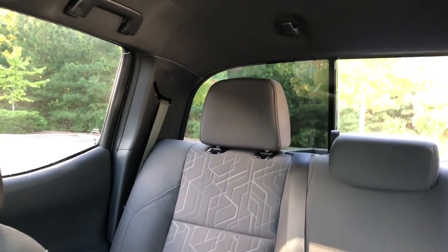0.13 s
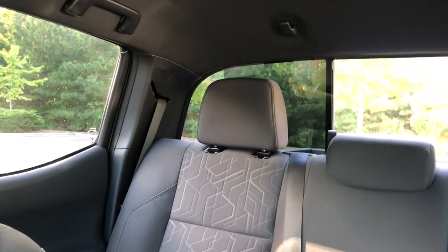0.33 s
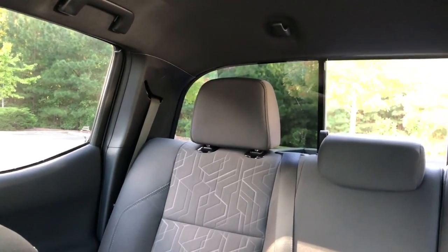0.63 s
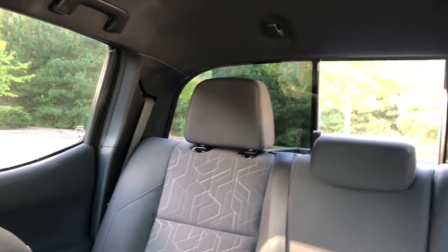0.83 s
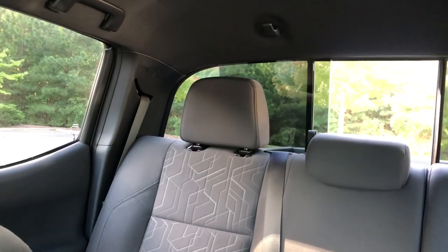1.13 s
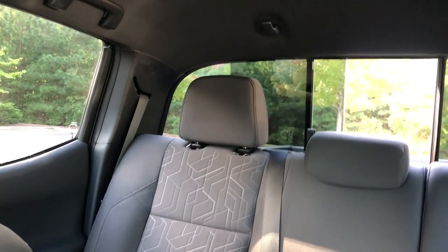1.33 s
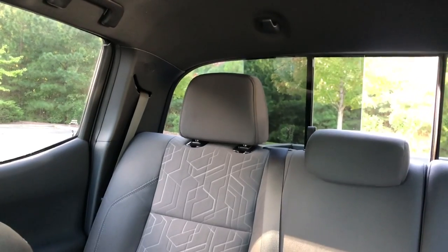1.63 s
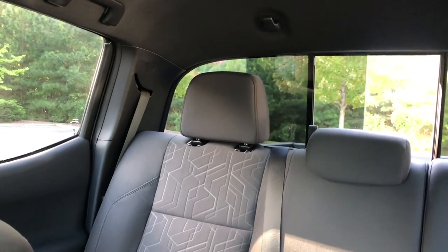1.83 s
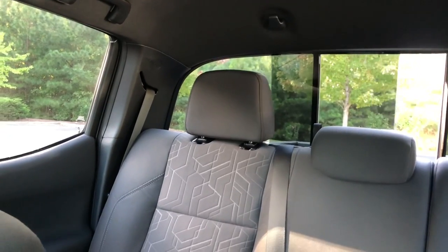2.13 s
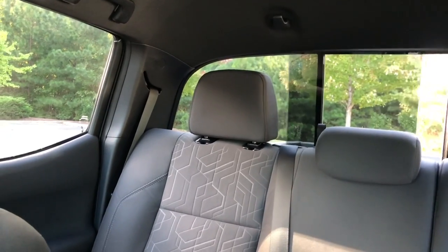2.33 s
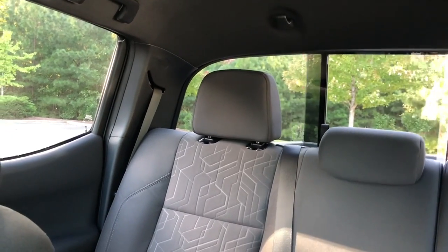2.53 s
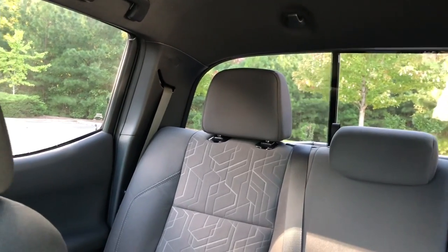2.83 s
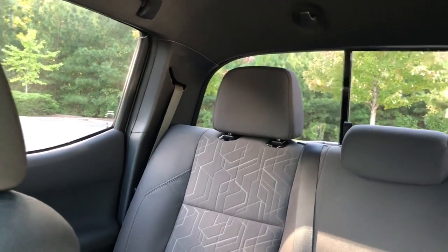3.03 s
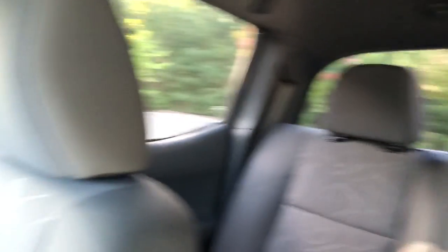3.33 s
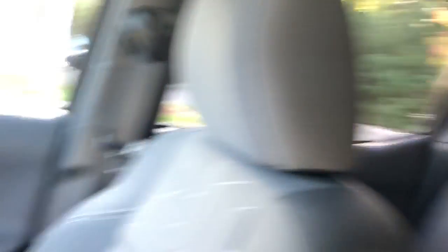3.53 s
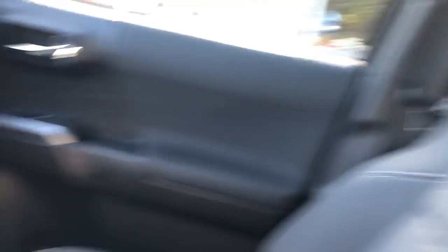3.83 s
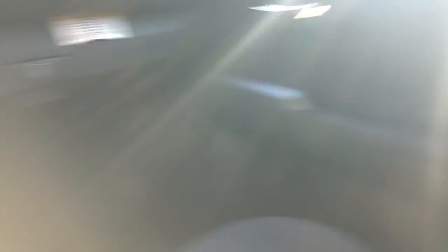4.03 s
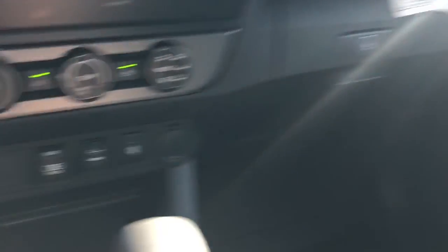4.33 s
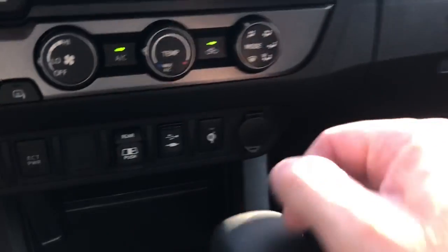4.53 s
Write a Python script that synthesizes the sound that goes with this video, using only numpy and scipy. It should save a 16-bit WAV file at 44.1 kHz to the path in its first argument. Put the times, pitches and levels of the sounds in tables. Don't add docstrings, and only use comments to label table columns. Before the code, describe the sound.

Handheld phone microphone inside an idling pickup. A sliding rear window already moving clunks to a halt; after a pause, ticks and knocks precede a second humming run, a short gap, then a longer third run that strains and cracks against its stop. Finally, soft cloth swishes and a flurry of low handling bumps.

```python
import sys
import numpy as np
from scipy import signal
from scipy.fft import rfft, irfft
from scipy.io import wavfile
from scipy.ndimage import uniform_filter1d

SR = 44100
rng = np.random.default_rng(int(sys.argv[2]) if len(sys.argv) > 2 else 0)


def master_out(mix):
    frames = np.transpose(np.atleast_2d(mix))
    ceiling = np.clip(frames, -1, 1)
    pcm = np.round(ceiling * 32767).astype(np.int16)
    wavfile.write(sys.argv[1], SR, pcm)


def invert_db(level):
    return 10 ** (np.asarray(level, dtype=float) / 20)


N = 207132
T = np.arange(N) / SR


def colour(x, db_of_hz):
    f = np.fft.rfftfreq(len(x), 1 / SR) + 1
    y = irfft(rfft(x) * invert_db(db_of_hz(f)), len(x))
    return y / y.std()


def lifts(f, modes):
    return sum(db / (1 + (2 * (f - hz) / width) ** 2) for hz, width, db in modes)


def noise(shape, db):
    hz, gain = np.transpose(shape)
    return invert_db(db) * colour(rng.standard_normal(N), lambda f: np.interp(np.log(f), np.log(hz), gain))


def band(x, lo_hz, hi_hz):
    return signal.sosfilt(signal.butter(2, [lo_hz, min(hi_hz, .45 * SR)], "band", fs=SR, output="sos"), x)


def walk(rate):
    k = int(SR / rate)
    steps = np.repeat(rng.standard_normal(N // k + 1), k)
    return 1.293 * uniform_filter1d(uniform_filter1d(steps, k), k)[:N]


def curves(rows, fade=0.014):
    s, *columns = np.transpose(rows)
    gate = np.clip(np.minimum(T - s[0] + fade, s[-1] + fade - T) / fade, 0, 1)
    return [gate] + [np.interp(T, s, c) for c in columns]


def tone(hz, db):
    return np.sqrt(2) * invert_db(db) * np.sin(2 * np.pi * (np.cumsum(hz) / SR + rng.random()))


def add(out, s, x, db):
    i = int(s * SR)
    out[i:i + len(x)] += (x * invert_db(db) / np.abs(x).max())[:N - i]


def clicks(events, slope_db, rise_s, rise_share, top_hz):
    out, t = np.zeros(N), T[:SR // 8]
    for s, db, hz, t60 in events:
        def tint(f):
            slope = slope_db * np.log2(f / hz)
            low_cut = -24 * np.log2(1 + 700 / f) ** 2
            high_cut = -6 * np.log2(1 + (f / top_hz) ** 4)
            return slope + low_cut + high_cut + lifts(f, [(hz, 0.35 * hz, 8)])

        burst = colour(rng.standard_normal(len(t)), tint)
        rise = max(rise_s + rise_share * t60, .0005)
        decay = invert_db(-60 * np.maximum(t - rise, 0) / np.clip(t60, .01, .25))
        add(out, s - .5 * rise, burst * np.minimum(t / rise, 1) ** 2 * decay, db)
    return out


def blows(events, body, scatter_db, rise_s):
    out, t = np.zeros(N), T[:SR // 3]
    f, mode_db = np.transpose(body)
    for s, db, hz, tilt_db, t60 in events:
        chance = rng.standard_normal((3, len(f)))
        gain = invert_db(mode_db + tilt_db * np.log2(f / 200) + scatter_db * chance[0]) * np.sign(chance[2])
        t60 = np.clip(t60, .02, .17)
        ring = t60 * (200 / f) ** .5
        mode_hz = f * (1 + 0.043 * chance[1])
        x = (gain * invert_db(-60 * t[:, None] / ring) * np.sin(2 * np.pi * mode_hz * t[:, None])).sum(axis=1)
        x = x + 1.75 * invert_db(-60 * t / t60) * np.sin(2 * np.pi * hz * t)
        add(out, s - .001, x * (1 - np.exp(-(t / rise_s) ** 2)), db)
    return out


def idle():
    # hz, level_db (per Hz)
    cabin = [(15, -57.5), (25, -15.5), (53, -8.5), (75, -8.5), (113, 1), (156, -4.5), (194, -5),
             (267, -14.5), (298, -10.5), (332, -16.5), (369, -16.5), (446, -19.5), (1620, -34), (1810, -40),
             (15600, -62)]
    # multiple of the firing rate, level_db (re firing line)
    orders = [(2, -2.5), (2.5, -2.5), (3, -5), (4, -7.5), (5, -14)]
    # start_s, level_db
    rumble = [
        (0, -45),
        (1.2, -45.5),
        (1.78, -46.5),
        (2.3, -43),
        (2.95, -46.5),
        (4.2, -43.5),
        (4.7, -39),
    ]
    firing_hz, line_db, order_db = 49.96, -50, -50.5
    turn_s, turn_takes_s, shadow_db = 3.57, .2, -24
    line_db = line_db + shadow_db * np.clip((T - turn_s) / turn_takes_s, 0, 1)
    hz = firing_hz * (1 + 0.00384 * walk(2.89))
    line = tone(hz, line_db + .7 * walk(6))
    upper = sum(tone(k * hz, db + order_db + 1.7 * walk(15)) for k, db in orders)
    throb = 1 + 0.05 * np.sin(np.pi * np.cumsum(hz) / SR)
    rumble_db = curves(rumble)[1]
    return line + upper + throb * noise(cabin, rumble_db + .9 * walk(12))


def felt_on_glass():
    # hz, level_db (per Hz)
    slide = [(710, -48), (1200, -35), (1800, 1.5), (1940, -9), (2190, -1), (2800, -1), (3090, -1),
             (3620, 1), (3950, 3.5), (4350, -2), (6610, -9), (7050, -10), (9830, -11.5), (10700, -16.5),
             (15600, -20.5)]
    # hz, width_hz, lift_db
    pane = [(2130, 47, 2), (2660, 55, -14), (2960, 110, -1), (3420, 64, 6), (3705, 450, -8.5),
            (4020, 60, -6), (4500, 250, 2.5), (4800, 140, 2.5), (5650, 76, 4.5), (6620, 90, 7.5),
            (6830, 180, -3), (7160, 110, -10), (8400, 170, -2), (10100, 180, 3.5), (10400, 200, -2),
            (11300, 300, 4)]
    streak_db, patchy_db = -25, 4.5
    felt = colour(noise(slide, 0), lambda f: lifts(f, pane))
    other = colour(noise(slide, 0), lambda f: lifts(1.045 * f, pane))
    turn = np.pi / 4 * (1 + 1.1 * walk(6))
    felt = invert_db(1.3 * walk(40)) * (np.cos(turn) * felt + np.sin(turn) * other)
    for hz, _, _ in pane:
        streak = band(rng.standard_normal(N), hz - 30, hz + 30)
        level_db = streak_db - 10 * max(np.log2(hz / 4500), 0) + patchy_db * walk(7)
        felt = felt + invert_db(level_db) * streak / streak.std()
    return felt


def drive(start, stop, hz, db, grind_db, strain_db):
    sag_hz_per_s, spin_up_s, spin_up_db, fade_db_per_s2 = 28, 0.17, -10, 15
    hiss_db, bite_db, bite_s = -62.5, -4, 0.016
    lurch_db, lurch_s, strain_s = 4, 0.023, 0.1
    since, left = np.maximum(T - start, 0), np.maximum(stop - T, 0)
    on, = curves([(start,), (stop,)], 0.0046)
    strain_db = strain_db * np.exp(-left / strain_s)
    db = db + spin_up_db * np.exp(-(since / spin_up_s) ** 2) - fade_db_per_s2 * since ** 2
    hiss_db = hiss_db + bite_db * np.exp(-since / bite_s) + 0.36 * strain_db
    grind_db = grind_db + lurch_db * np.exp(-since / lurch_s) + strain_db
    return on, hz - sag_hz_per_s * since, db, hiss_db, grind_db


def motor():
    # start_s, pitch_hz, level_db
    runs = [
        [(0.0, 138.7, -40), (0.072, 129, -34.5), (0.138, 131.7, -38), (0.158, 132, -59), (0.19, 129.6, -36),
         (0.27, 126.3, -32.5)],
        [(1.1, 109.8, -38.5), (1.206, 112.4, -49), (1.27, 114, -34.5), (1.288, 110.3, -52), (1.32, 114.7, -38),
         (1.39, 116.5, -50), (1.456, 117.9, -32.5), (1.49, 114.9, -44.5), (1.634, 111.2, -46)],
        [(1.93, 126.6, -43), (2.02, 127.3, -44), (2.252, 126.7, -34.5), (2.316, 118.7, -44.5),
         (2.346, 114.4, -55), (2.412, 126.1, -40), (2.616, 126.4, -34), (2.692, 131.2, -27),
         (2.83, 132.8, -27.5)],
    ]
    # start_s, stop_s, whine_hz, whine_db, grind_db
    gearing = [
        (-.3, 0.287, 910, -73, -56.5),
        (1.054, 1.647, 902, -61, -54),
        (1.916, 2.816, 897.5, -62.5, -54.5),
    ]
    strain = [16, 0.5, 9.5]
    overtone_db, octave_db = -55.5, -74.5
    out = np.zeros(N)
    felt = felt_on_glass()
    gears = 2.96 * band(rng.standard_normal(N), 120, 776) * invert_db(2.0 * walk(29.7))
    for run, whine, strain_db in zip(runs, gearing, strain):
        gate, hum_hz, hum_db = curves(run, 0.057)
        hum_hz = hum_hz * (1 + 0.0061 * walk(11.9))
        hum = tone(hum_hz, hum_db) + tone(2 * hum_hz, overtone_db + 3.5 * walk(25))
        on, hz, db, hiss_db, grind_db = drive(*whine, strain_db)
        hz = hz * (1 + .003 * walk(14))
        upper_db = octave_db + .4 * (db - whine[3]) + 2.5 * walk(20)
        whining = tone(hz, db + 1.2 * walk(20)) + tone(2 * hz, upper_db)
        out += gate * hum + on * (whining + invert_db(hiss_db + 1.5) * felt + invert_db(grind_db) * gears)
    return out


def latch_cracks():
    # start_s, peak_db, ring_hz, t60_s
    cracks = [(0.083, -45.5, 2350, 0.04), (0.167, -44.5, 1690, 0.086), (.268, -36.5, 3500, 0.066),
              (.278, -28.5, 2950, 0.0253), (.284, -46, 1584, 0.085), (0.690, -42.5, 1400, 0.049),
              (0.938, -42.5, 1410, 0.26), (0.963, -55, 1200, 0.11), (1.664, -47, 1800, 0.051),
              (2.812, -44, 4500, 0.081), (2.816, -40, 2400, 0.08), (2.829, -29.5, 3980, .028),
              (3.171, -49.5, 1390, .03), (.245, -45, 3000, .12)]
    return clicks(cracks, slope_db=-10.5, rise_s=.0016, rise_share=.03, top_hz=9000)


def pane_knocks():
    # start_s, peak_db, main_hz, t60_s
    knocks = [(.272, -16, 140.5, 0.088), (.277, -18, 197, 0.14), (.283, -22, 292, 0.12),
              (0.289, -26.5, 101, 0.2), (.697, -33, 157.5, 0.15), (0.941, -27.5, 127, 0.19),
              (0.951, -35, 246, 0.17), (.985, -33, 241, .15), (1.004, -32, 401, 0.095),
              (1.020, -27, 147, 0.22), (1.055, -25.5, 126, 0.065), (1.063, -24.5, 215, 0.053),
              (1.063, -27, 643, 0.052), (1.076, -26, 643, .1), (1.657, -33, 360, 0.14),
              (1.926, -35, 79.4, 0.19), (2.832, -19.5, 200, 0.084), (2.842, -21, 340, 0.058),
              (2.855, -22, 164, 0.096), (2.868, -38.5, 334, 0.21), (2.885, -32, 123, 0.2),
              (3.276, -32.5, 152, 0.25), (3.554, -36.5, 186, 0.12), (3.676, -38, 123, 0.067)]
    # hz, level_db
    panel = [(98, -7.5), (130, 3.5), (162, -3), (207, 3), (250, -19.5), (285, -2), (330, -0.5), (395, -6.5),
             (470, -8.5), (560, -6), (630, -4.5), (800, -6.5), (980, -8), (1180, -17), (1450, -16)]
    tilted = [(s, db, hz, -2 + 1.5 * np.log2(hz / 200), t60) for s, db, hz, t60 in knocks]
    return blows(tilted, panel, scatter_db=3.0, rise_s=0.0018)


def switch_ticks():
    # start_s, peak_db, ring_hz, t60_s
    ticks = [(0.311, -43, 3300, 0.013), (0.688, -45, 4500, .03), (.932, -47, 4500, .075),
             (.986, -53, 6500, 0.042), (1.079, -44, 4420, 0.073), (1.646, -43, 5340, .06),
             (1.900, -53, 1746, 0.078), (1.911, -44.5, 4500, 0.05), (3.270, -42, 6700, 0.05),
             (3.424, -60.5, 6500, .18)]
    return clicks(ticks, slope_db=-5, rise_s=0.00026, rise_share=.09, top_hz=22000)


def pane_clatter():
    # start_s, peak_db, ring_hz, t60_s
    clatter = [(0.615, -49.5, 1000, .04), (3.553, -52, 800, 0.065), (.950, -50, 1450, 0.071),
               (0.999, -45.5, 1500, .08), (1.008, -50, 1000, 0.11), (1.019, -56, 1510, 0.08),
               (1.035, -52, 1190, 0.075), (1.055, -44, 2040, .033), (1.060, -40.5, 2070, 0.048),
               (2.833, -50, 2340, 0.021), (2.848, -42, 2210, .055)]
    return clicks(clatter, slope_db=-15, rise_s=0.04, rise_share=.015, top_hz=9000)


def frame_scuff():
    scuff = (2.783, -36, 2200, 0.01)  # start_s, peak_db, ring_hz, t60_s
    return clicks([scuff], slope_db=-2.5, rise_s=.011, rise_share=0, top_hz=11500)


def sleeve_rustle():
    # hz, level_db (per Hz)
    cloth = [(1060, -3), (1800, -1.5), (2450, -5.5), (2990, -4.5), (3710, -7), (5520, -7.5), (7040, -10),
             (15200, -17.5), (15600, -13)]
    # middle_s, half_length_s, level_db, sizzle_db
    strokes = [(3.118, 0.045, -65.5, -2), (3.0, 0.064, -81, -2), (3.266, .1, -72.5, -2),
               (3.458, .08, -73.5, 1), (3.685, 0.14, -66, 0), (3.91, 0.11, -63.5, 0.5),
               (4.119, 0.15, -68.5, -1), (4.34, 0.11, -64, 0), (4.49, 0.064, -62, 0), (4.7, 0.06, -64.5, 3)]
    s, half, db, sizzle_db = np.transpose(strokes)
    level = np.sqrt((invert_db(db) ** 2 * np.exp(-((T[:, None] - s) / half) ** 2)).sum(axis=1))
    swish = level * noise(cloth, 1.0 + 1.2 * walk(60))
    top = band(swish, 7100, 19000)
    return swish + (invert_db(np.interp(T, s, sizzle_db)) - 1) * top


def finger_taps():
    # start_s, peak_db, main_hz, brightness_db (per octave)
    taps = [(4.290, -30, 117, -5), (4.307, -21, 185, -5), (4.319, -16.5, 205, -3), (4.328, -24.5, 80, -16),
            (4.348, -24, 161, -6), (4.361, -23.5, 109, -9), (4.380, -20, 202, -8), (4.385, -21, 160, 0.5),
            (4.394, -26.5, 185, -3), (4.45, -27.5, 299, -8), (4.461, -24, 109, -14), (4.49, -54, 121, -21),
            (4.513, -24, 240, -9), (4.532, -34, 267, 4), (4.554, -28.5, 383, -2), (4.564, -21.5, 368, 9),
            (4.572, -22.5, 171, -10), (4.587, -32, 101, -14), (4.610, -32, 192, 2), (4.617, -24, 177, -4.5),
            (4.643, -26, 217, 2), (4.672, -36, 197, -5)]
    # hz, level_db
    hand = [(50, -13), (75, -4), (130, 4), (190, 6.5), (265, 1.5), (390, 0.5), (520, -2), (680, -13),
            (900, -27)]
    t60_s, damping = 0.05, .35
    damped = [(s, db, hz, tilt_db, t60_s * (200 / hz) ** damping) for s, db, hz, tilt_db in taps]
    return blows(damped, hand, scatter_db=3.5, rise_s=0.0022)


def scene():
    running = idle() + motor()
    window = latch_cracks() + pane_knocks() + switch_ticks() + pane_clatter() + frame_scuff()
    handling = sleeve_rustle() + finger_taps()
    return (running + window + handling)[None]


def top_cut(x):
    return signal.sosfilt(signal.butter(12, 15750, fs=SR, output="sos"), x)


def record(dry):
    x = signal.sosfilt(signal.butter(3, 34, "high", fs=SR, output="sos"), dry)
    x = signal.sosfilt(signal.ellip(8, .2, 60, 15750, fs=SR, output="sos"), x)
    return top_cut(x)


dry = scene()
out = record(dry)
master_out(out)
```